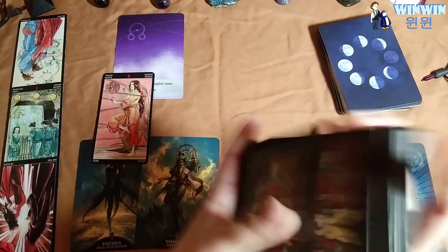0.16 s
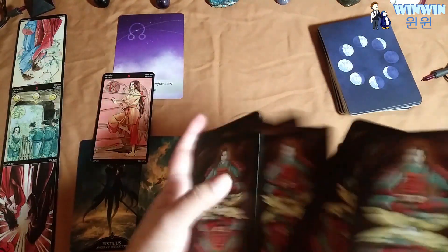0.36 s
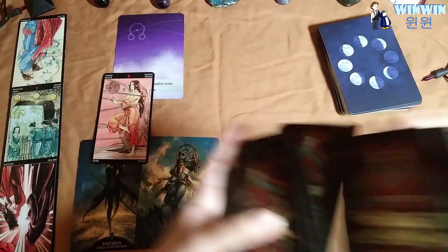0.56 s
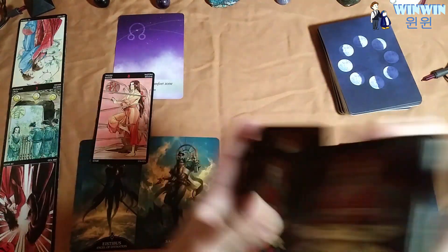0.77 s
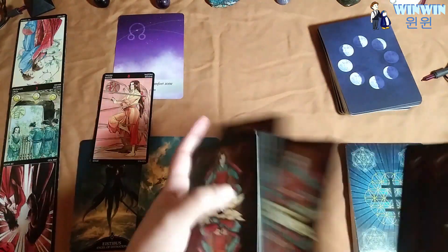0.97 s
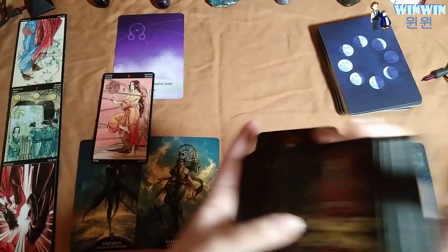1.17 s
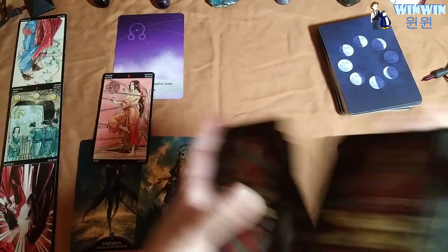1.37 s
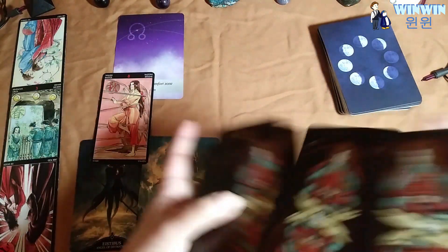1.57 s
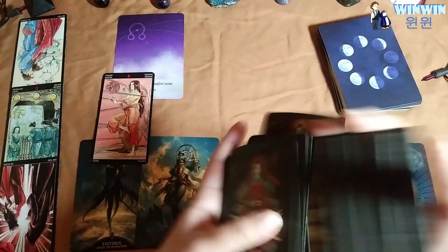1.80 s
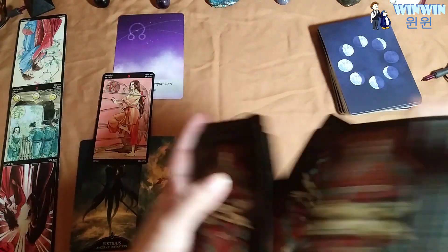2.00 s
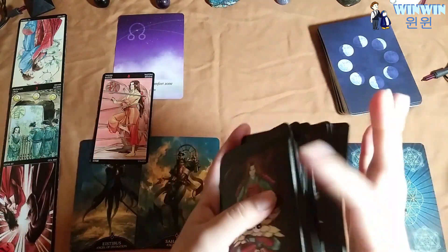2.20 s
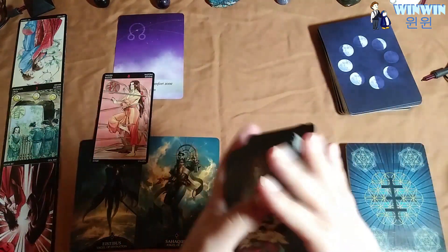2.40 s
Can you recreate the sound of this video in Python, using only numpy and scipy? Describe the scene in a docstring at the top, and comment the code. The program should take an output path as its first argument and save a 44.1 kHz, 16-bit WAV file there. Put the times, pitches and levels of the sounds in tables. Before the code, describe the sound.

Large cards shuffled overhand, sharp papery slaps and swishing rustles in uneven bursts, close and dry

```python
"""First a hiss and a hollow rub: two hands shuffle large cards overhand above a cloth-covered table.
Friction is random slips, flickering in level and shaped into a hiss and a resonant rubbing tone.
Knocks ring as damped modes of the struck table and cards, driven by a snap and a rattle of single cards.
Air puffs are pressure swings, edge scrapes are narrow-band noise and a faint squeak is a gliding sine.
A short dull echo follows the cards; room noise, a faint wavering hum and a slow rumble lie beneath."""
import sys
import numpy as np
from scipy import signal
from scipy.fft import rfft, irfft
from scipy.io import wavfile
from scipy.ndimage import uniform_filter1d

SR = 44100
rng = np.random.default_rng(int(sys.argv[2]) if len(sys.argv) > 2 else 0)


def unload_wav(signal):
    """Save mono or channel-first audio to the path in sys.argv[1] as 16-bit WAV at rate SR, clipped to [-1, 1]."""
    wavfile.write(
        sys.argv[1],
        SR,
        np.round(np.clip(np.atleast_2d(signal).T, -1, 1) * 32767).astype(np.int16),
    )


N = 108045  # length in samples


def amp(db):
    """Level law: decibels to an amplitude ratio."""
    return 10 ** (np.asarray(db) / 20)


def evened(x):
    """Normalisation to unit root-mean-square."""
    return x / np.sqrt(np.mean(x ** 2) + 1e-20)


def add(mix, s, sound):
    """Superposition: adds a sound in place from time s, cut at the end of the mix."""
    part = mix[round(s * SR):][:len(sound)]
    part += sound[:len(part)]


def colour(x, points):
    """Spectral shaping by an outline of f/Hz, level/dB; -80 dB below it, the last level held above it."""
    hz = np.fft.rfftfreq(len(x), 1 / SR)
    f, db = np.transpose(points)
    outline_db = np.interp(np.log(hz + 1), np.log(f + 1), db, left=-80)
    return evened(irfft(rfft(x) * amp(outline_db), len(x)))


def resonate(x, hz, width):
    """Simple resonance: two poles, bandwidth in Hz, peak gain near 1."""
    hz = np.clip(hz, 20, SR / 2 - 500)
    b, a = signal.iirpeak(hz, hz / width, SR)
    return signal.lfilter(b, a, x)


def grains(per_s, spread_db):
    """Stick-slip friction as a random train of tiny slips of uneven size."""
    size = amp(spread_db * np.minimum(rng.exponential(1, N), 4))
    slips_now = rng.random(N) < per_s / SR
    return size * rng.standard_normal(N) * slips_now


PATCH_DB = 1.9  # standard deviation of the patches


def patchy(x):
    """Time-varying spectrum: random patches of tone colour drift over time."""
    z = signal.stft(x, nperseg=256, noverlap=192)[2]
    field = uniform_filter1d(rng.standard_normal(z.shape), size=3, axis=0)  # across frequency
    field = evened(uniform_filter1d(field, size=10, axis=1))  # along time
    return evened(signal.istft(z * amp(PATCH_DB * field), nperseg=256, noverlap=192)[1][:N])


# Course of the friction, one list per pass of the hand: t/s, hiss level/dB before the brightness tilt,
# rub level/dB before RUB_DB, hiss brightness/dB (treble over bass)
PASS_COURSES = [
    [(0.0, -59, -54, 3), (0.024, -40.5, -62, 5), (0.066, -61, -63.5, -14), (0.12, -61.5, -59, -9)],
    [(0.12, -61, -53.5, -8), (0.158, -51.5, -58, 2), (0.186, -58, -63, -6), (0.196, -51, -51, 17),
     (0.226, -33.5, -68, 4), (0.25, -56.5, -47.5, -8), (0.298, -48, -55.5, 5), (0.314, -40.5, -47.5, 3.5),
     (0.37, -61, -57, -14), (0.43, -63.5, -58, -16)],
    [(0.43, -59, -72, 1), (0.49, -45, -49.5, 5), (0.496, -33, -62, -14), (0.504, -45.5, -50, -8),
     (0.518, -37.5, -37.5, -16.5), (0.564, -57, -43, -16), (0.578, -44, -41, -12),
     (0.622, -44.5, -36.5, 7.5), (0.66, -64.5, -69, -10), (0.69, -69, -57, -10)],
    [(0.69, -72, -55.5, -6), (0.734, -62, -64.5, 0.1), (0.75, -76, -61, -6), (0.826, -86, -68, 6),
     (0.846, -48, -44, 3), (0.868, -48.5, -43, 4), (0.888, -65, -56, -12), (0.958, -39.5, -45.5, 5),
     (0.998, -67, -62.5, -9), (1.056, -59.5, -55.5, 3), (1.1, -86, -73, 0.1)],
    [(1.1, -90, -60, 0.1), (1.128, -81, -66, 0.1), (1.133, -57.5, -54.5, -22), (1.176, -47, -55, 7),
     (1.202, -63, -53.5, -4), (1.254, -60, -58, 6), (1.264, -48, -53, 12.5), (1.27, -53.5, -47.5, 3),
     (1.32, -79, -71, 6), (1.338, -59.5, -51, -2), (1.44, -89, -83, 13)],
    [(1.472, -75, -80, -14), (1.476, -43.5, -78, -2), (1.49, -48, -66, 10), (1.514, -71, -56, 7),
     (1.584, -51.5, -54, 8), (1.64, -70, -56.5, -11), (1.678, -58.5, -55.5, 8), (1.69, -66, -55, 7)],
    [(1.69, -71, -65, 22), (1.718, -46, -51, -4.5), (1.774, -64.5, -50.5, 1), (1.779, -43.5, -49, -8),
     (1.816, -47.5, -48, -5), (1.824, -58.5, -54, -7), (1.916, -46.5, -52.5, -5.5), (1.958, -65.5, -63, -7),
     (2.01, -68.5, -59, -19), (2.07, -74, -81, -16)],
    [(2.07, -79, -76, -4), (2.09, -56, -49.5, -3), (2.132, -38.5, -46.5, 3), (2.202, -53.5, -40.5, -9),
     (2.232, -70, -73, -16), (2.288, -75, -67, -27.5), (2.348, -47.5, -50.5, -4), (2.422, -71, -84, -20.5),
     (2.45, -65, -56, -9)],
]
# Spectrum of the hiss: f/Hz, relative density level/dB
HISS_SPECTRUM = [(1060, -57), (1800, -11), (3760, -8), (4310, -3.5), (5120, -7), (6250, -6), (9240, -5),
                 (14300, -10.5), (15800, -8.5)]
# Resonances of the hollow rub: f/Hz, bandwidth/Hz, relative level/dB
RUB_MODES = [(1050, 330, 2.5), (1430, 158, 7.5), (2030, 570, -3), (3310, 310, -2), (4160, 450, -6)]
HISS_SLIPS_PER_S, HISS_SPREAD_DB, FLICKER_DB, SPLIT_HZ = 3000, 3.5, 2.0, 7100
RUB_SLIPS_PER_S, RUB_SPREAD_DB, RUB_DB = 6000, 2.5, -4.5


def sliding():
    """Sliding friction: slips between card faces give a broad hiss and excite a hollow rubbing tone."""
    t = np.arange(N) / SR
    rows = np.concatenate(PASS_COURSES)
    rows = rows[np.argsort(rows[:, 0], kind="stable")]
    hiss_db, rub_db, bright_db = (np.interp(t, rows[:, 0], column) for column in rows[:, 1:].T)

    friction = grains(HISS_SLIPS_PER_S, HISS_SPREAD_DB) + rng.standard_normal(N)
    hiss = patchy(colour(friction, HISS_SPECTRUM))
    dull = signal.filtfilt(*signal.butter(1, SPLIT_HZ, fs=SR), hiss)
    bright = hiss - dull
    hiss = dull * amp(-bright_db / 2) + bright * amp(bright_db / 2)
    flicker = evened(uniform_filter1d(rng.standard_normal(N), 150))

    slips = grains(RUB_SLIPS_PER_S, RUB_SPREAD_DB)
    rub = np.zeros(N)
    for k, (hz, width, db) in enumerate(RUB_MODES):
        rub += (-1) ** k * amp(db) * resonate(slips, hz, width)  # neighbours in opposite phase
    return hiss * amp(FLICKER_DB * flicker + hiss_db) + evened(rub) * amp(RUB_DB + rub_db)


# Spectrum of the room noise: f/Hz, relative density level/dB
ROOM_SPECTRUM = [(35, -28), (60, -11), (96, -20.5), (130, -20.5), (267, -31.5), (1010, -35.5),
                 (1300, -32.5), (3720, -57), (4920, -41.5), (5660, -79), (15800, -81)]
# Spectrum of the slow rumble: f/Hz, relative density level/dB
RUMBLE_SPECTRUM = [(2.4, -100), (4.0, 18.5), (16, 7), (32, -6.5), (100, -19), (130, -66), (220, -120)]
ROOM_DB, RUMBLE_DB = -62.5, -47.5
HUM_HZ, HUM_WIDTH_HZ, HUM_DB = 240.2, 22, -72


def background():
    """Stationary noise: two shaped spectra, and a hum that wavers because it is narrow-band noise."""
    room_noise, rumble_noise, hum_noise = rng.standard_normal((3, N))
    room = amp(ROOM_DB) * colour(room_noise, ROOM_SPECTRUM)
    rumble = amp(RUMBLE_DB) * colour(rumble_noise, RUMBLE_SPECTRUM)
    hum = resonate(resonate(hum_noise, HUM_HZ, HUM_WIDTH_HZ), HUM_HZ, HUM_WIDTH_HZ)
    return room + rumble + amp(HUM_DB) * evened(hum)


ECHO_DB, ECHO_T60_S, ECHO_RISE_S, ECHO_TOP_HZ = -16, 0.098, 0.0011, 3600


def echo(x):
    """Reverberation: convolution with exponentially decaying noise, a short dull tail from table and walls."""
    t = np.arange(SR // 3) / SR
    tail = rng.standard_normal(len(t)) * amp(-60 * t / ECHO_T60_S) * np.minimum(t / ECHO_RISE_S, 1)
    tail = signal.lfilter(*signal.butter(1, ECHO_TOP_HZ, fs=SR), tail)
    return amp(ECHO_DB) * signal.fftconvolve(x, tail / np.linalg.norm(tail))[:N]


# Modes of the struck table and cards: f/Hz before detuning, bandwidth/Hz, relative level/dB within the zone
KNOCK_MODES = [(202, 220, -4), (342, 320, -1.5), (526, 258, -3), (803.5, 61, 13), (1000, 360, 9),
               (1257, 212, 7), (1470, 74, 6.5), (1706, 294, 0), (2010, 240, -3.5), (3200, 560, 11),
               (4080, 1030, 2), (7400, 11600, -13), (11600, 5400, -11)]
DETUNE = 0.035  # random detuning per knock: standard deviation as a share of f
BODY_TOP_HZ, TREBLE_FROM_HZ = 650, 2600  # zones: body, ring, treble
BODY_DB, TREBLE_DB = 6.5, 3.5  # added to the body and treble columns
FOCUS_DB = 31  # loss of a ring mode one octave from the knock's centre, growing as octaves squared
HARD_DB, SOFT_PER_DB = -18, 0.15  # weaker knocks than HARD_DB lose snap, dB per dB
LIGHT_PER_DB = 0.35  # and stir the lowest modes less, dB per octave per dB
SNAP_S, RATTLE_DB = 0.00006, -9


def knock(peak_db, ring_hz, treble_db, body_db, rattle_s, noise, detunes):
    """Modal excitation: a snap and a dying rattle of single cards set damped modes of table and cards ringing."""
    t = np.arange(len(noise)) / SR
    softness_db = min(peak_db - HARD_DB, 0)
    snap = amp(SOFT_PER_DB * softness_db) * t / SNAP_S * np.exp(1 - t / SNAP_S)
    rattle = amp(RATTLE_DB) * noise * np.exp(-t / max(rattle_s, 0.0004))
    drive = snap + rattle

    zones = np.zeros((3, len(t)))
    for (mode_hz, width, db), detune in zip(KNOCK_MODES, detunes):
        hz = mode_hz * (1 + DETUNE * detune)
        zone = int(mode_hz > BODY_TOP_HZ) + int(mode_hz > TREBLE_FROM_HZ)
        if zone == 0:
            db = db + LIGHT_PER_DB * softness_db * np.log2(BODY_TOP_HZ / hz)
        elif zone == 1:
            db = db - FOCUS_DB * np.log2(hz / ring_hz) ** 2
        zones[zone] += amp(db) * resonate(resonate(drive, hz, 4 * width), hz, width)

    # each zone is scaled to its own peak
    gains = amp([BODY_DB + body_db, 0, TREBLE_DB + treble_db]) / abs(zones).max(1)
    return -amp(peak_db) * gains @ zones


# Impacts of card packets: t/s, peak level of the ring/dB, centre f/Hz of the ring,
# treble level/dB before TREBLE_DB and body level/dB before BODY_DB (both relative to the ring),
# rattle decay time/s (floored at 0.4 ms)
PACKET_KNOCKS = [(0.0378, -41.5, 1470, -6, -10.5, 0.00059), (0.185, -40.5, 1470, -8.0, -13, 0.0039),
                 (0.201, -40.5, 1150, -13, -11, 0.0023), (0.2187, -28.5, 1330, -4, -14.5, 0.003),
                 (0.2263, -15, 1680, -13, -20, 0.0074), (0.2326, -31, 1540, -5, -17.5, 0.0018),
                 (0.2545, -38, 1370, -20, -27, 0.0016), (0.258, -31, 1540, -14, -14, 0.0035),
                 (0.295, -45, 1520, -3, -15, 0.0047), (0.3064, -43, 1690, -3, -21, 0.0034),
                 (0.4931, -13.5, 1590, -9.5, -14, 0.004), (0.4998, -14, 1420, -11, -15, 0.003),
                 (0.5073, -25, 1320, -11, -11.5, 0.0011), (0.5147, -10, 1086, -12.5, -17.5, 0.0059),
                 (0.5173, -29, 1050.0, -13, -3.5, 0.0021), (0.5474, -33.5, 1690, -3.5, -15, 0.0046),
                 (0.5785, -25, 1810, -10, -23, 0.011), (0.6075, -29, 1250.0, -4, -8, 0.0022),
                 (0.6192, -17.5, 1370, -8, -12, 0.0053), (0.6238, -25, 1420, -2, -6, 0.001),
                 (0.628, -17.5, 1090, -25, -16, 0.0018), (0.634, -26.5, 1250, -21, -15, 0.012),
                 (0.8274, -41.5, 1050.0, -28, -13.5, 0.0014), (0.8452, -36, 1180, -10.5, -7, 0.0028),
                 (0.8521, -23, 1360, -12, -26, 0.0012), (0.8553, -30.5, 1130.0, -5, -7.5, 0.0043),
                 (0.8635, -31.5, 1330, -10.5, -30, 0.004), (0.8866, -43.9, 1380.0, -17, -10, 0.0034),
                 (0.906, -36, 1390, -9, -19, 0.0047), (0.9126, -44.5, 1150.0, -3, -7, 0.0021),
                 (0.95, -36, 1170, -6, -7, 0.0019), (0.9614, -38.5, 1410, -13, -3.5, 0.0016),
                 (0.9637, -30, 1410, -26, -20, 0.0023), (0.9672, -32, 920, -18, -13, 0.0017),
                 (0.9757, -32.5, 1270, -8, -13.5, 0.0027), (0.989, -37, 1150, -9, -22, 0.002),
                 (1.0373, -46, 1190, -10, -15, 0.0056), (1.1336, -37.5, 1840, -7.5, -19, 0.0044),
                 (1.1394, -43, 1780, -16, -29, 0.0054), (1.161, -31, 1110, -14, -18.5, 0.0013),
                 (1.1707, -25.5, 1170, -16, -12, 0.0011), (1.1735, -33.5, 1500, -12, -21.5, 0.005),
                 (1.2665, -38.5, 1050, -13, -9.5, 0.0037), (1.274, -50, 1150, -21, -27, 0.0058),
                 (1.2909, -37.5, 1210, -9.5, -13, 0.0016), (1.339, -58, 1400.0, -10, -23, 0.0025),
                 (1.474, -46.5, 1000.0, -25, -0.5, 0.0019), (1.4763, -20.5, 1650, -8, -19.5, 0.0023),
                 (1.4812, -32, 1700.0, -14, -13, 0.003), (1.491, -27, 1170, -24, -11, 0.0012),
                 (1.6035, -40, 1470, -4, -6.5, 0.0015), (1.73, -43, 1370.0, -12, -13, 0.0049),
                 (1.746, -40, 1380, -17, -20, 0.0038), (1.7703, -42, 1370, -19, -8, 0.0015),
                 (1.7766, -28.5, 1494, -5, -13, 0.00035), (1.7838, -26, 1240, -8, -16, 0.0033),
                 (1.7906, -31, 1320, -23, -38, 0.007), (1.8147, -40, 1290, -10, -16, 0.0024),
                 (1.849, -38, 1310, -4, -14, 0.0085), (1.8545, -40.5, 1400, -4.5, -17, 0.0051),
                 (1.8764, -47, 2010.0, 2, -34, 0.0027), (1.9243, -33.5, 950, -11.5, -8.5, 0.00068),
                 (1.9286, -40.5, 1070.0, -19, -12, 0.0057), (1.9973, -49, 1400.0, 0, -14, 0.0022),
                 (2.1072, -42.5, 1850, -1, -19, 0.0021), (2.1105, -38.5, 1450, -10, -20, 0.0045),
                 (2.1344, -31.5, 1340, -6.5, -16, 0.004), (2.1545, -29, 1520, -7, -13.5, 0.0057),
                 (2.1593, -30.5, 1430, -16, -21, 0.0038), (2.1718, -37, 1900, 0, -13.5, 0.004),
                 (2.1945, -35.5, 1620, -1, -9.5, 0.0024), (2.211, -41, 900.0, -17, -2.5, 0.0061)]
CLICKY_DB = 4.5  # single cards land with very uneven force


def knocks():
    """Impact sequence: the superposed knocks, each with its own rattle noise and mode detuning."""
    mix = np.zeros(N)
    noise = rng.standard_normal((len(PACKET_KNOCKS), 3000))
    force = np.minimum(rng.exponential(1, noise.shape), 5)
    noise = noise * amp(CLICKY_DB * force - 2 * CLICKY_DB)
    detunes = rng.standard_normal((len(PACKET_KNOCKS), len(KNOCK_MODES)))
    for (s, *settings), rattle_noise, detune in zip(PACKET_KNOCKS, noise, detunes):
        add(mix, s, knock(*settings, rattle_noise, detune))
    return mix


# Air squeezed from between packets: t/s of contact, level/dB before the pulse shape, decay time/s
AIR_PUFFS = [(.227, -38, 0.022), (.494, -38, 0.0019), (.515, -35.5, 0.0062), (0.853, -33, 0.0036),
             (0.904, -42.5, 0.0052), (1.166, -60, 0.0032), (1.476, -30.5, 0.0018), (1.784, -35, 0.0076),
             (2.154, -39.5, 0.0081), (2.209, -35.5, 0.0077)]


def puffs():
    """Air displacement: pressure dips as packets close in, jumps at contact and settles."""
    mix = np.zeros(N)
    t = np.arange(-1500, 1500) / SR  # contact at 0
    for s, db, decay_s in AIR_PUFFS:
        jump = np.tanh(t / 0.00099)
        add(mix, s + t[0], amp(db) * jump * np.exp(-abs(t) / decay_s))
    return mix


# Narrow bright scrapes of a card edge: t/s, length/s, centre f/Hz, level/dB before the swell
EDGE_SCRAPES = [(0.3, 0.04, 4450, -46.5), (0.618, .009, 3295, -33)]
SCRAPE_WIDTH_HZ = 310


def scrapes():
    """Narrow-band friction: noise through a double resonance, swelling fast and fading."""
    mix = np.zeros(N)
    noises = rng.standard_normal((len(EDGE_SCRAPES), 4000))
    for (s, length, hz, db), noise in zip(EDGE_SCRAPES, noises):
        u = np.arange(0, length, 1 / SR) / length
        band = evened(resonate(resonate(noise, hz, SCRAPE_WIDTH_HZ), hz, SCRAPE_WIDTH_HZ))
        settled = band[-len(u):]
        add(mix, s, amp(db) * np.sin(np.pi * np.sqrt(u)) * settled)
    return mix


# Faint falling squeak, a single row: t/s, length/s, starting f/Hz, glide/(Hz per s), peak level/dB
EDGE_SQUEAK = (.397, .03, 5250, -16000, -65)


def squeak():
    """Linear frequency glide: a short whistle from a card edge that swells and fades."""
    s, length, hz, glide, db = EDGE_SQUEAK
    mix = np.zeros(N)
    t = np.arange(0, length, 1 / SR)
    tone = np.sin(2 * np.pi * (hz * t + glide * t ** 2 / 2))
    add(mix, s, amp(db) * np.sin(np.pi * t / length) * tone)
    return mix


def scene():
    """Superposition: the cards with their echo, the puffs without one, and the background."""
    cards = sliding() + knocks() + scrapes() + squeak()
    return (cards + echo(cards) + puffs() + background())[None]


EDGE_HZ = 15800


def record(dry):
    """Band limitation: a steep linear-phase low-pass."""
    low_pass = signal.firwin(1023, EDGE_HZ, window=("kaiser", 9), fs=SR)
    return signal.oaconvolve(dry, low_pass[None], "same")


dry = scene()
out = record(dry)
unload_wav(out)
```